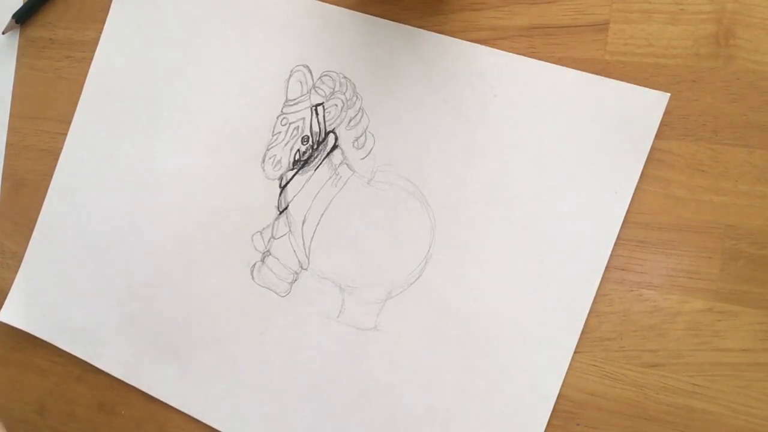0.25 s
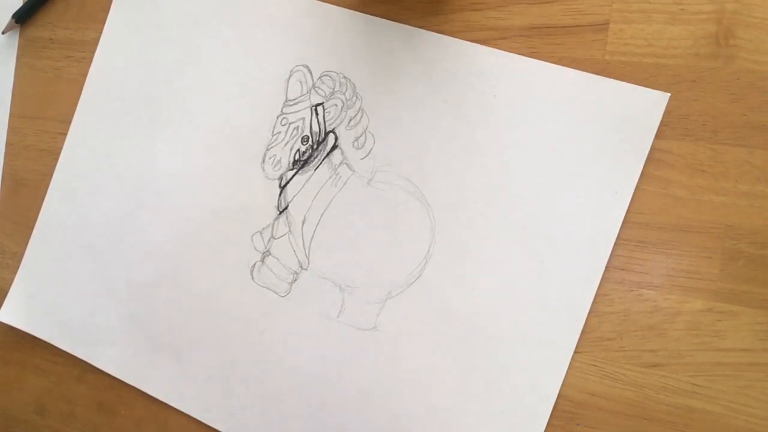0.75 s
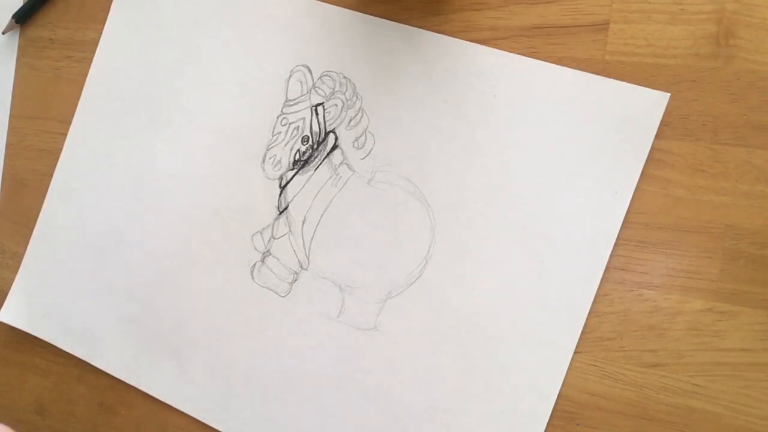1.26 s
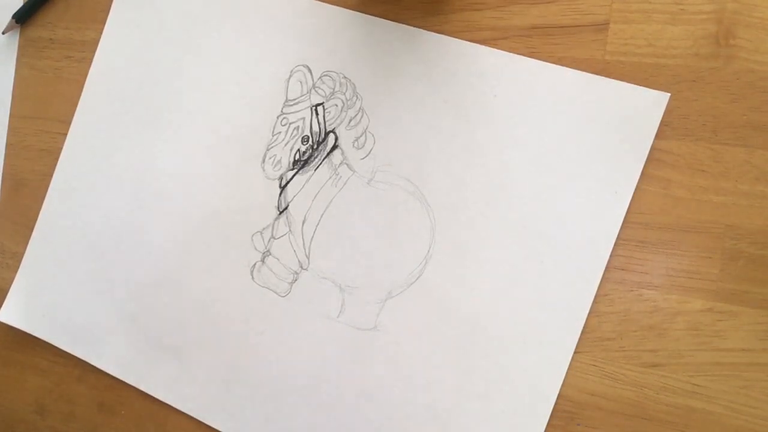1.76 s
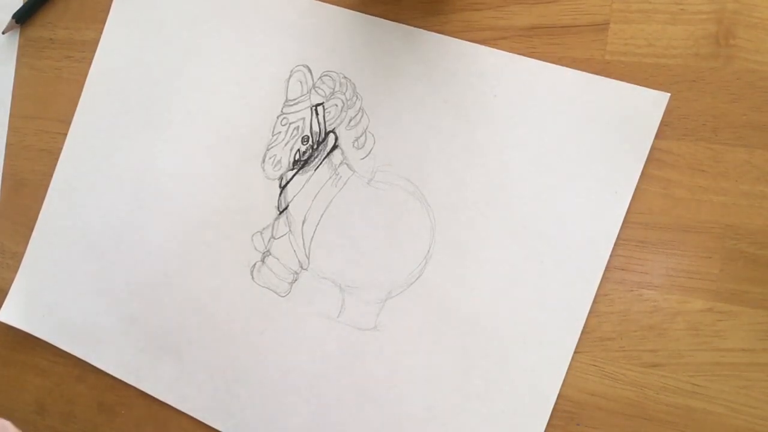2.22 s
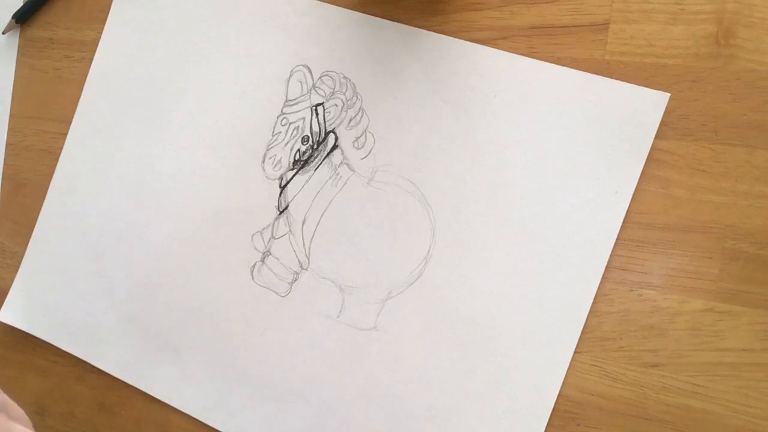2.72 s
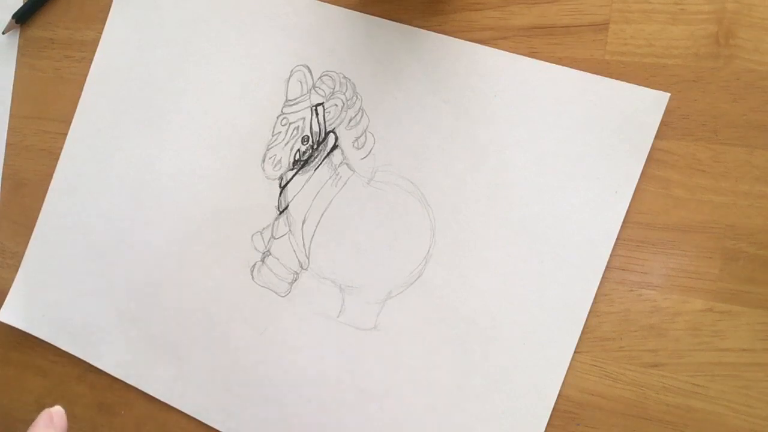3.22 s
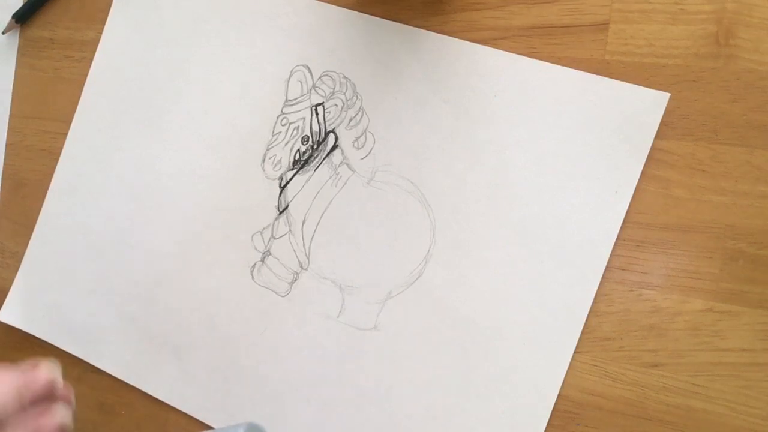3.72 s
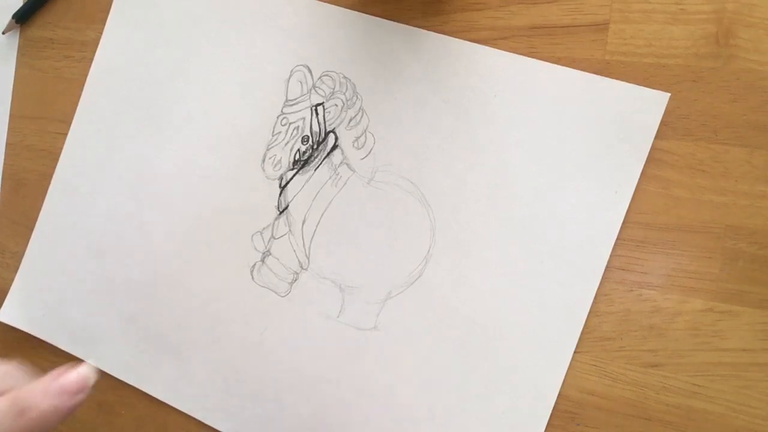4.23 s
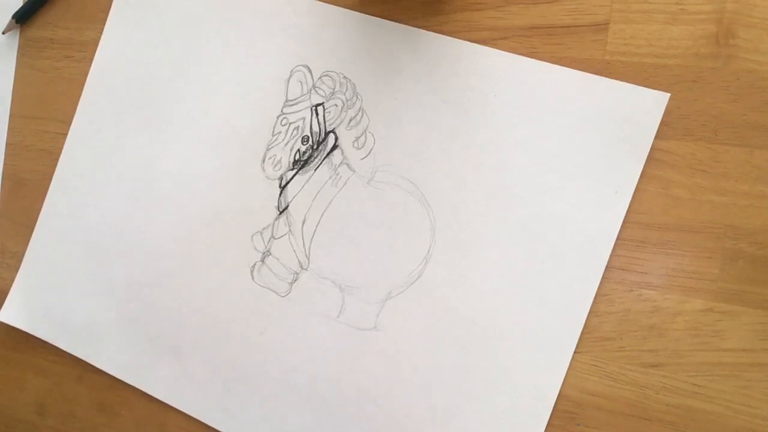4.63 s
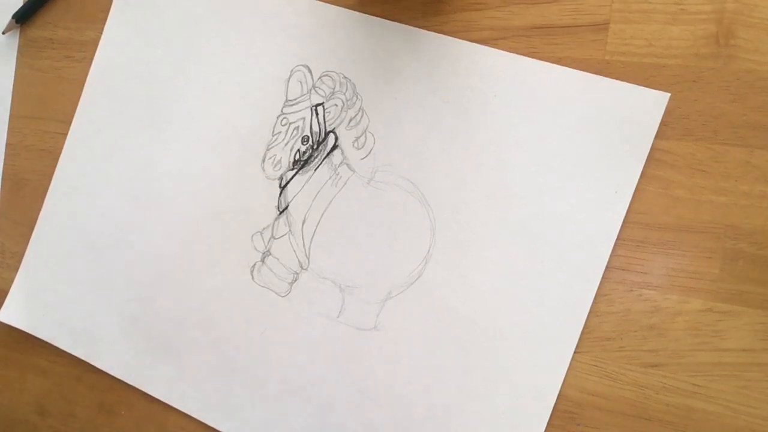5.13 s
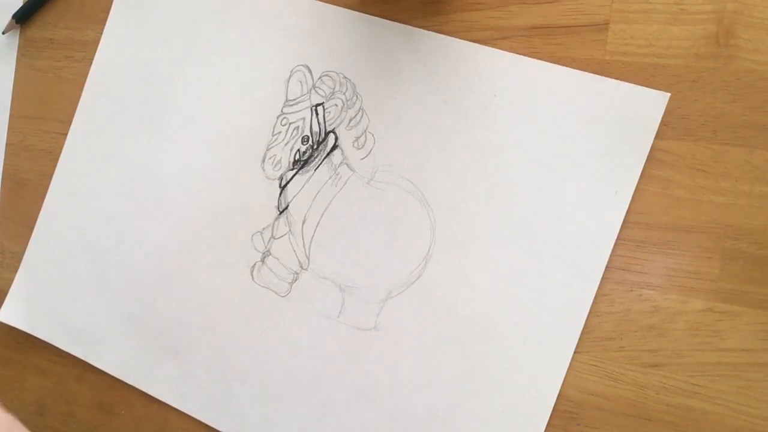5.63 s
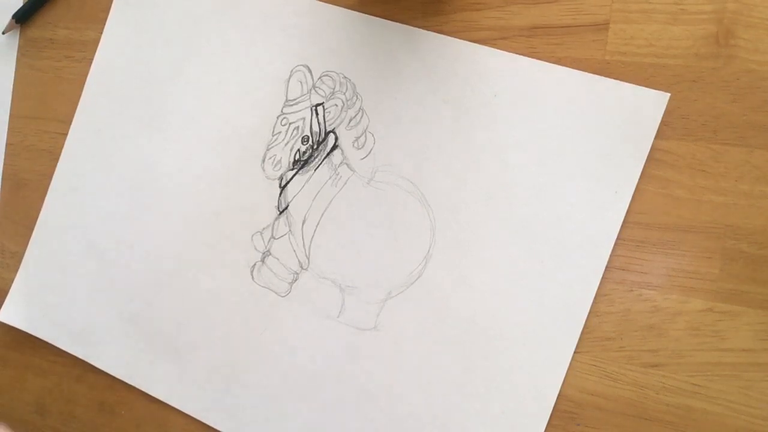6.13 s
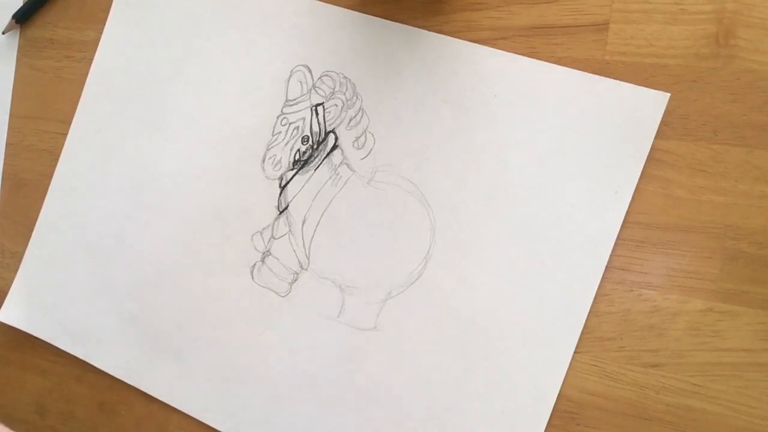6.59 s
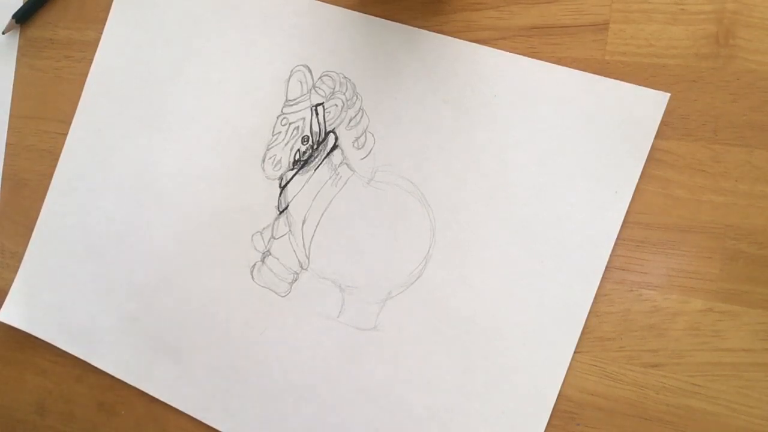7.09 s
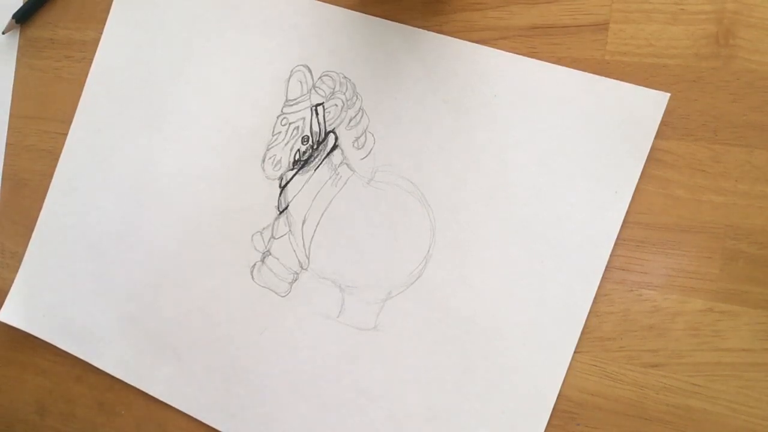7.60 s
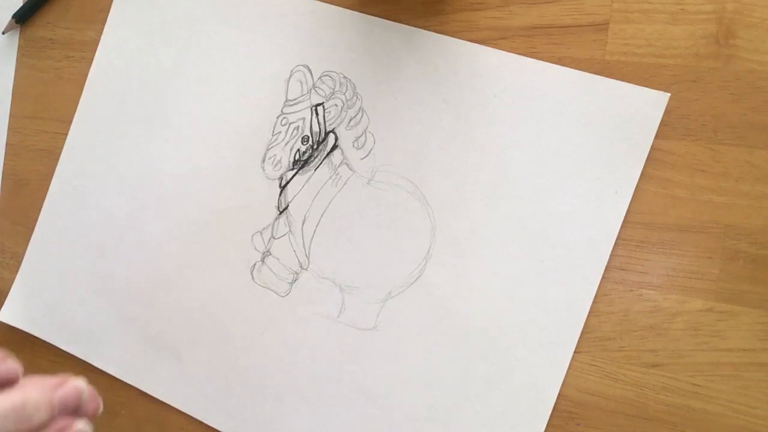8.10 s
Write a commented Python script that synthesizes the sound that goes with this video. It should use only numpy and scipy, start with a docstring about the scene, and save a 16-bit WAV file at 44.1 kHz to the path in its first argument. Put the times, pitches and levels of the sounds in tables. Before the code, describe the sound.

A quiet room with low restless rumble, faint hiss and a wavering distant fan hum, heard close. From 0 to 1.2 s soft dull bumps and a lumpy jostle of hands surround the first short dry rasps of a pencil in a small sharpener, at about 0.5 to 0.85 s. Light clicks follow, then another scraping group from 1.5 to 2 s with tiny cracks. After a near-still pause with small ticks, a denser run at 2.8 to 3.6 s crackles with splinters and ends in a stronger, duller scrape. Faint low bumps follow. Crisp finger clicks come at 4.65 and 4.9 s. A swelling stroke at 5.2 s, a small woody knock at 5.7 s with a rasp, and brief scrapes at 6.3 s lead to the longest burst, 6.9 to 7.8 s, with sharp snaps near 7.2 and 7.75 s. A last small click and swish at 7.9 s, then room tone.

```python
"""A pencil is twisted in a small hand sharpener over a wooden desk in a quiet room.
The blade bites and shaves by stick-slip: noise strokes change level and ease, coloured by wood and echoes.
Splinters snap off as short cracks, and the sharpener clicks in the fingers as decaying shell modes.
Soft low bumps and a jostle are band-limited rumble, and short swishes are resonant grainy noise.
Room hiss, a restless rumble and a wavering fan hum lie beneath; all but these and the low rumbles reverberate."""
import sys
import numpy as np
from scipy import signal
from scipy.fft import rfft, irfft, next_fast_len
from scipy.io import wavfile
from scipy.ndimage import uniform_filter1d

SR = 44100
rng = np.random.default_rng(int(sys.argv[2]) if len(sys.argv) > 2 else 0)


def generate_wav(signal):
    """Clip the signal to [-1, 1] and save it as 16-bit WAV at the path in sys.argv[1]."""
    frames = np.transpose(np.atleast_2d(signal))
    scaled = np.clip(frames, -1, 1) * 32767
    pcm = np.round(scaled).astype(np.int16)
    wavfile.write(sys.argv[1], SR, pcm)


N = 368235
TIME = np.arange(N) / SR

# Strokes of the cut, some in several parts. Each row: start in seconds, bite to crest in seconds,
# ease in seconds, relative level at the bite in dB, relative level at the crest in dB, rasp in dB,
# treble in dB, reference pitch of the main hollow in Hz, pitch of the small hollow in Hz,
# small hollow lift in dB, blade whistle in Hz, whistle lift in dB.
STROKES = [(0.485, 0.023, 0.076, -67, -72.5, 7, 4, 2400, 5230, -8, 9500, -8),
           (0.548, 0.15, 0.11, -63.5, -57.5, 3, 2, 2560, 5200, -2, 9800, -8),
           (0.72, 0.074, 0.076, -60, -50.5, 0.5, 1, 2500, 5300, 0, 9200, 0),
           (1.478, .04, 0.45, -60.5, -60, -2, -4.5, 2340, 5000, 0.5, 8250, 6.5),
           (1.605, 0.16, 0.11, -65.5, -61, 2.5, 2, 2570, 5250, 1.5, 7000, -4),
           (1.775, 0.072, 0.052, -60.5, -54.5, 0.5, 2, 2540, 4900, 0, 8800, 4),
           (1.891, 0.13, .022, -76, -73.5, -2, 4.5, 2600, 5030, -4, 9600, -3),
           (2.833, 0.24, 0.07, -60, -55, 0.5, 2.5, 2550, 5160, 1, 12500, -16),
           (3.112, 0.082, 0.09, -61, -60.5, -4.5, -2.5, 2700, 5150, 8, 9500, 7),
           (3.245, 0.2, 0.02, -64.5, -63.5, -0.5, 0, 2740, 5170, 0, 9300, -6),
           (3.406, 0.035, 0.079, -60, -53.5, -2, -6, 2720, 5200, -1, 8450, 4),
           (3.519, 0.027, 0.082, -46, -48.5, -10.5, -10, 2660, 5370, 2, 9300, -7),
           (5.165, 0.13, 0.04, -70.5, -49, 1, 2, 2580, 5300, -1, 8600, -5),
           (5.733, .16, 0.041, -59, -55.5, 1, 0.5, 2580, 5650, 0, 9900, 3),
           (6.266, 0.09, .035, -63.5, -59, 1.5, 0, 2500, 5200, -3, 11300, 2),
           (6.362, 0.064, 0.072, -57.5, -53.5, 3.5, 3, 2700, 5130, -14, 12300, -2),
           (6.884, 0.12, 0.22, -62, -57.5, 2, -0.5, 2680, 5300, -8, 11800, -4),
           (7.04, 0.14, 0.13, -70, -52.5, 0.5, 2.5, 2580, 5400, -3, 9100, -0.5),
           (7.29, 0.046, 0.17, -69, -61.5, -6, 1, 2750, 5270, -2, 9450, -3),
           (7.402, 0.063, 0.06, -56.5, -55, 4.5, -1.5, 2660, 4900, 4, 9500, -2),
           (7.513, 0.013, 0.13, -62, -60, 2.5, 2.5, 2680, 5130, 3, 11400, 2),
           (7.621, 0.059, 0.12, -60, -54, -7.5, -3, 2920, 5570, -5, 7860, 3),
           (7.733, 0.032, 0.013, -55, -50.5, 1, 0, 2900, 5500, -2, 7950, 1)]


def amp(db):
    """Logarithmic level: decibels become an amplitude gain."""
    return 10 ** (np.asarray(db) / 20)


def evened(x):
    """Mean power: scales a signal to an rms of 1."""
    return x / np.sqrt(np.mean(x ** 2) + 1e-20)


def read(points, hz):
    """Spectral interpolation along a logarithmic frequency axis."""
    f, value = np.transpose(points)
    return np.interp(np.log(hz + 1), np.log(f + 1), value)


def add(mix, s, sound):
    """Superposition: adds a sound in place from time s, or from 0 if s is negative."""
    part = mix[max(round(s * SR), 0):][:len(sound)]
    part += sound[:len(part)]


def band(x, hz, kind, order=2):
    """Butterworth low-pass or high-pass filtering."""
    sections = signal.butter(order, min(hz, SR / 2 - 1), kind, fs=SR, output="sos")
    return signal.sosfilt(sections, x)


def coloured(x, points, size=4096):
    """Minimum-phase filtering: the log spectrum fixes the phase through the Hilbert transform."""
    log_gain = np.log(amp(read(points, abs(np.fft.fftfreq(size, 1 / SR)))))
    taps = np.fft.ifft(np.exp(np.conj(signal.hilbert(log_gain)))).real
    return signal.oaconvolve(x, taps[:size // 2])[:len(x)]


def resonate(x, hz, width):
    """Heterodyne resonance of gain 1: shifts the curve hz to zero, smooths there and shifts back."""
    carrier = np.exp(2j * np.pi * np.cumsum(hz) / SR)
    r = np.exp(-np.pi * width / SR)
    baseband = signal.lfilter([1 - r], [1, -r], x / carrier + 1e-18)
    return 2 * (carrier * baseband).real


def drift(rate):
    """Band-limited random motion of rms 1: noise with only the frequencies below rate in Hz."""
    size = next_fast_len(N, True)
    spectrum = rfft(rng.standard_normal(size))
    slow = np.fft.rfftfreq(size, 1 / SR) < rate
    return evened(irfft(spectrum * slow, size)[:N])


def air(swell_db=1.0, waver=0.49, rumble_swell_db=3.0, rumble_hz=300):
    """Background noise: shaped hiss over a restless rumble, with fan tones wavering in level and phase."""
    # The room's rumble and hiss. Each row: frequency in Hz, relative spectral level in dB.
    air_spectrum = [(15, -63), (25, -20.5), (49, -1), (107, -5.5), (140, -4), (204, -6.5), (297, -9.5),
                    (350, -16.5), (445, -16.5), (614, -19), (762, -24), (1200, -25), (2120, -32),
                    (4300, -42), (12000, -49), (15500, -55.5)]
    # Hum of a distant fan. Each row: frequency in Hz, rms level in dB before wavering.
    fan_tones = [(140, -65.5), (258, -71.5), (362, -76), (600, -77.5)]
    air_db = -55.5  # rms level of the noise
    hz = np.fft.rfftfreq(N, 1 / SR)
    noise = irfft(rfft(rng.standard_normal(N)) * amp(read(air_spectrum, hz)), N)
    rumble = irfft(rfft(noise) / (1 + (hz / rumble_hz) ** 2), N)
    hiss = noise - rumble
    noise = hiss * amp(swell_db * drift(5.5)) + rumble * amp(rumble_swell_db * drift(9.3))
    hum = np.zeros(N)
    for tone_hz, db in fan_tones:
        level = amp(db) * np.sqrt(2) * (1 + waver * drift(6))
        hum += level * np.sin(2 * np.pi * tone_hz * TIME + drift(6.3))
    return amp(air_db) * evened(noise) + hum


def bumps(low_hz=58, knee=0.19, reach=1.32):
    """Band-limited impacts: dull swells of rumble, each with its own upper edge."""
    # Soft low bumps of handling. Each row: centre in seconds, level in dB (the rms is 3 dB lower),
    # length in seconds, edge in Hz that reach and knee multiply into two low-pass corners.
    bump_rows = [(0.025, -39, 0.051, 128), (0.298, -50, .04, 121), (0.387, -43.5, 0.11, 247),
                 (0.462, -38.5, 0.1, 237), (.463, -50, 0.014, 480), (0.588, -44.5, 0.051, 246),
                 (0.662, -43, 0.03, 300), (0.693, -45, 0.036, 280), (0.726, -35, 0.027, 292),
                 (0.765, -34.5, 0.046, 315), (0.869, -33, 0.072, 197), (0.904, -33, 0.029, 220),
                 (0.993, -41, 0.051, 201), (1.032, -38, 0.034, 242), (1.111, -40, 0.0251, 220),
                 (1.145, -36, .045, 188), (1.484, -49.5, 0.075, 99), (2.01, -51.5, .1, 80),
                 (2.52, -53, 0.16, 110), (3.695, -49, 0.043, 110), (4.093, -49, 0.1, 92),
                 (6.048, -43.5, 0.029, 130), (6.193, -41, 0.061, 58), (7.176, -52, 0.11, 130)]
    out = np.zeros(N)
    noise = band(rng.standard_normal(N), low_hz, "high", order=4)
    for s, db, length, hz in bump_rows:
        window = np.hanning(int(length * SR))
        rumble = band(noise[int(s * SR):][:SR // 2], hz * reach, "low", order=3)
        rumble = band(rumble, hz * knee, "low", order=1)
        swell = evened(rumble[-len(window):] * window)
        add(out, s - length / 2, amp(db) * swell / np.sqrt(2))
    return out


def swishes(grain_db=3):
    """Resonant filtering: brief windows of grainy noise, twice filtered around one pitch."""
    # Short grainy swishes: a ringing at the opening, scrapes, and some within the cutting strokes.
    # Each row: centre in seconds (the earliest may be moved to start at 0), level in dB (the rms is
    # 3 dB lower), length in seconds, pitch in Hz, width of each resonance as a share of the pitch.
    swish_rows = [(.058, -74.5, 0.12, 3600, 0.061), (0.08, -65.5, 0.16, 1290, 0.74),
                  (.07, -61, .13, 980, 0.3), (2.487, -70.5, 0.053, 5400, 0.5),
                  (2.531, -70.5, 0.22, 2050, 0.54), (3.58, -63, 0.15, 1700, .9),
                  (3.705, -65.5, 0.1, 2200, 0.95), (4.695, -61, .036, 2160, 0.2),
                  (4.904, -66, 0.044, 2070, 0.3), (0.791, -57.5, 0.031, 1840, 0.29),
                  (5.297, -64.5, .06, 1650, 0.39), (5.719, -63.5, 0.073, 900, 0.34),
                  (6.797, -73, 0.19, 2350, .44), (7.424, -50, 0.043, 2550, 0.23),
                  (7.93, -67, 0.034, 2600, 0.67), (7.929, -66, 0.03, 3920, 0.08)]
    out = np.zeros(N)
    for s, db, length, hz, width_share in swish_rows:
        count = int(length * SR)
        grains = evened(uniform_filter1d(rng.standard_normal(count), size=80))
        push = rng.standard_normal(count) * amp(grain_db * grains)
        pitch, width = np.full(count, hz), hz * width_share
        swish = resonate(resonate(push, pitch, width), pitch, width)
        add(out, s - length / 2, amp(db) * evened(swish * np.hanning(count)) / np.sqrt(2))
    return out


def room(x, size=256):
    """Diffuse reverberation: noise decays at its own rate in each band, fastest in the lows."""
    # Reverberation of the room. Each row: frequency in Hz, decay by 60 dB in seconds.
    decay_times = [(200, .12), (1000, 0.52), (4000, 0.64), (14000, 0.43)]
    hz, t, z = signal.stft(rng.standard_normal(SR // 2), SR, nperseg=size)
    decay = amp(-60 * t / read(decay_times, hz)[:, None])
    tail = signal.istft(z * decay, SR, nperseg=size)[1]
    tail[:SR // 200] = 0  # a gap of 5 ms before the tail
    return signal.oaconvolve(x, tail / np.linalg.norm(tail))[:N]


def jostle(low_hz=52, high_hz=190, lumpy_db=4, lumps_per_s=22):
    """Amplitude-modulated rumble: it swells and fades lumpily as the hands settle into their grip."""
    start_s, length_s, level_db = 0.21, 1.22, -50
    rumble = band(rng.standard_normal(N), low_hz, "high", order=4)
    rumble = band(rumble, high_hz, "low", order=3)
    rumble = band(rumble, low_hz, "low", order=1)
    lumps = amp(lumpy_db * np.tanh(drift(lumps_per_s)))
    arch = np.sin(np.pi * np.clip((TIME - start_s) / length_s, 0, 1))
    return amp(level_db) * evened(rumble * lumps) * arch


def pressure(t, crest_s, ease_s, bite_db, crest_db):
    """Level envelope: the blade bites, the level moves from bite to crest, eases and is released."""
    bite_s, release_s = 0.017, 0.012  # the blade catches and lets go
    # The level moves from bite to crest, slowly at first, then faster; it then eases by ease_db.
    crest_power, ease_db = 1.55, 16
    approach = np.clip(t / crest_s, 0, 1)
    ease = np.clip((t - crest_s) / ease_s, 0, 1)
    held = amp(bite_db + (crest_db - bite_db) * approach ** crest_power - ease_db * ease)
    release = np.exp(-np.maximum(t - crest_s - ease_s, 0) / release_s)
    return np.minimum(t / bite_s, 1) * held * release


def patchy(x, patch_db=1.5, patch_hz=520, patch_s=0.024, size=256):
    """Time-frequency modulation: bright and dull patches come and go as the blade meets new grain."""
    hop = size // 4
    z = signal.stft(x, SR, nperseg=size, noverlap=size - hop)[2]
    field = rng.standard_normal(z.shape)
    for axis, width in enumerate([patch_hz * size / SR, patch_s * SR / hop]):
        for _ in range(2):
            field = uniform_filter1d(field, max(round(width), 1), axis)
    modulated = z * amp(patch_db * evened(field))
    return signal.istft(modulated, SR, nperseg=size, noverlap=size - hop)[1][:N]


def echoed(x, sway=0.1314, sways_per_s=2.5):
    """Comb filtering: near echoes stripe the spectrum, and the stripes slide as the hands move."""
    # First echoes off the fingers, the palm and the desk.
    # Each row: mid delay in seconds, about which it sways, and gain.
    echo_rows = [(.00055, -0.082), (.0011, -0.43), (.0019, .25), (.0042, -0.27)]
    out = x.copy()
    for delay, gain in echo_rows:
        out += gain * np.interp(TIME - delay * np.exp(sway * drift(sways_per_s)), TIME, x)
    return out


def sharpener(force):
    """Source-filter coupling: force sounds through wood, hollows and echoes; gives middle, rasp, treble."""
    # Colour of the cut wood. Each row: frequency in Hz, gain in dB.
    wood_colour = [(200, -42.5), (700, -3.5), (1100, -11), (1600, -3), (2300, -6.5), (2850, -2),
                   (3150, -7.5), (3900, -5.5), (4600, -6.5), (6000, -6), (7000, -7), (9800, -7),
                   (10500, -11.5), (11200, -6.5), (13800, -11.5), (15500, -14)]
    # Hollows of the sharpener and the cupped hand. Each holds: pitch as a multiple of the row's
    # main hollow (first) or small hollow (second), width in Hz, lift in dB.
    main_hollow = (0.92, 526, 13)
    middle_hollow = (0.779, 430, 0.1)
    small_width_hz, whistle_width_hz = 500, 810
    notch_hz, notch_width_hz, notch_depth = 7180, 360, 0.28  # the cupped hand weakens this band
    grip_sway, grip_sways_per_s = 0.04, 12  # rms sway of log pitch, top rate in Hz
    start, *_, main_hz, small_hz, small_db, whistle_hz, whistle_db = np.transpose(STROKES)
    row = np.maximum(np.searchsorted(start, TIME, "right") - 1, 0)

    def held(values):
        """Smoothed steps: each part holds its own colour and glides into the next."""
        return uniform_filter1d(values[row], size=2048)

    def wandering(hz):
        """Frequency modulation: the pitch sways as the grip shifts."""
        return held(hz) * np.exp(grip_sway * drift(grip_sways_per_s))

    sound = coloured(force, wood_colour)
    for hz, (ratio, width, db) in [(main_hz, main_hollow), (small_hz, middle_hollow)]:
        sound = sound + amp(db) * resonate(sound, ratio * wandering(hz), width)
    # The small hollow opens and closes from part to part; the blade sings in one narrow band.
    sound = sound + amp(held(small_db)) * resonate(sound, wandering(small_hz), small_width_hz)
    sound = sound + amp(held(whistle_db)) * resonate(sound, held(whistle_hz), whistle_width_hz)
    swallowed = notch_depth * resonate(sound, np.full(N, notch_hz), notch_width_hz)
    sound = echoed(sound - swallowed)

    def above(hz):
        """Linear crossover, 600 Hz wide: keeps what lies above hz."""
        gain = np.clip((np.fft.rfftfreq(N, 1 / SR) - hz) / 600 + .5, 0, 1)
        return irfft(rfft(sound) * gain, N)

    upper, treble = above(3200), above(6000)
    return sound - upper, upper - treble, treble


def shaving(slips_per_s=210, clump_db=1.5, slip_spread_db=1, fibre_spread_db=1.0):
    """Stick-slip friction: the blade slips unevenly, each slip tearing fibres over a steady hiss."""
    slip_s, slip_jitter, steady_hiss = .0008, .62, .45  # slip decay, rms of log rate, hiss gain
    rasp_change_db = -1.5  # through each part the rasp gives way to a finer hiss
    cycles = np.cumsum(slips_per_s * np.exp(slip_jitter * drift(150))) / SR
    slip_db = slip_spread_db * np.clip(rng.standard_normal(N), -2, 2)
    slips = np.diff(np.floor(cycles), prepend=0) * amp(slip_db)
    tearing = evened(signal.lfilter([1], [1, -np.exp(-1 / (slip_s * SR))], slips))
    tearing = evened(tearing * amp(clump_db * np.tanh(drift(30))))  # slips come in clumps
    fibres = rng.standard_normal(N) * amp(fibre_spread_db * drift(3000))
    force = patchy(fibres * (steady_hiss + tearing / 2))
    middle, rasp, treble = (evened(part) for part in sharpener(force))
    out = np.zeros(N)
    for start, crest_s, ease_s, bite_db, crest_db, rasp_db, treble_db, *_ in STROKES:
        on = (TIME >= start) & (TIME < start + 1)
        t = TIME[on] - start
        progress = np.minimum(t / (crest_s + ease_s), 1) - .5
        rasp_gain = amp(rasp_db + rasp_change_db * progress)
        cut = middle[on] + rasp_gain * rasp[on] + amp(treble_db) * treble[on]
        out[on] += pressure(t, crest_s, ease_s, bite_db, crest_db) * cut
    return out


def splinters(snap_s=0.0011, level_db=-7.0, rasp_db=-1.5):
    """Impulsive fracture: each splinter breaks in a short crack that rings through the sharpener."""
    # Large splinters that snap off. Each row: start in seconds, force in dB before the filters
    # and level_db, treble in dB, which glides from snap to snap.
    snap_rows = [(.496, -52, 3), (.682, -43, -3), (.742, -42, -1), (1.522, -47, -4), (1.6263, -42, -8),
                 (1.855, -41, -4), (3.099, -45, 2), (3.2015, -41.5, 0), (3.315, -48, 6), (3.363, -38, 2.5),
                 (3.386, -39, 2), (3.421, -40, -3), (3.444, -43.5, -1), (3.494, -51, -3), (3.5405, -40, 1),
                 (5.262, -41, 2), (5.3234, -38, -1), (5.872, -41, 3), (5.898, -41, -5), (6.2682, -39.5, -3),
                 (7.1814, -34, -8), (7.3694, -40.5, -10), (7.431, -40, -10), (7.449, -39, 4),
                 (7.475, -41, -7), (7.527, -44, -2), (7.725, -42, -4), (7.7446, -33.5, -16),
                 (7.761, -36, -1)]
    t, force = np.arange(SR // 100) / SR, np.zeros(N)
    for s, db, _ in snap_rows:
        crack = evened(rng.choice([-1, 1], len(t)) * np.exp(-t / snap_s))
        add(force, s, amp(db) * crack * np.sqrt(snap_s / t[-1]))
    middle, rasp, treble = sharpener(force)
    s, _, treble_db = np.transpose(snap_rows)
    treble_gain = amp(np.interp(TIME, s, treble_db))
    return amp(level_db) * (middle + amp(rasp_db) * rasp + treble_gain * treble)


def struck(modes, crack_db, crack_s=0.0015):
    """Modal impact: a dry crack of contact and exponentially dying modes."""
    t = np.arange(SR // 16) / SR
    ring = np.zeros(len(t))
    for hz, db, t60 in modes:
        ring += amp(db - 60 * t / t60) * np.sin(2 * np.pi * (hz * t + rng.random()))
    crack = band(rng.standard_normal(len(t)), 810, "high") * np.exp(-t / crack_s)
    return ring + amp(crack_db) * crack


def peaked(x, db):
    """Peak normalisation: scales to a peak level."""
    return amp(db) * x / abs(x).max()


def handling(seat_db=-32, click_db=1, rebound_db=-21, detune=0.017):
    """Damped modal impacts: shell clicks in the fingers, and the pencil knocking home with two rebounds."""
    # Clicks of the sharpener in the fingers. Each row: start in seconds, peak in dB before click_db,
    # brightness as a corner in Hz, ring of the shell in dB.
    click_rows = [(.978, -53.5, 4500, -16), (1.05, -58.5, 11100, -20), (1.241, -55, 2010, 0),
                  (1.351, -54.5, 2230, -5), (2.323, -58.5, 20000, -17), (2.383, -54, 4600, -4),
                  (4.641, -36.5, 11800, -2.5), (4.686, -50.5, 3580, -1), (4.8821, -39, 3550, -7),
                  (4.93, -53.5, 6000, -8), (6.205, -54, 2200, 4), (6.832, -53.5, 15000, -12),
                  (7.867, -50, 2980, -21)]
    # Modes of the sharpener's shell. Each row: frequency in Hz before detuning,
    # level in dB before the click's ring is added, decay by 60 dB in seconds.
    shell_modes = [(1500, -7.5, 0.033), (1980, 6.5, 0.016), (2500, -4, 0.018), (2960, -2, 0.014),
                   (4070, -6.5, 0.017), (5300, -16, 0.011), (8400, -6, 0.0036), (13300, 2, 0.004)]
    # Modes of the pencil as it knocks home in the cone.
    # Each row: frequency in Hz, relative level in dB, decay by 60 dB in seconds.
    seat_modes = [(775, 7.5, 0.016), (950, -7, .011), (2370, -6, 0.0099), (3580, -3.5, 0.014),
                  (5260, -9, .0058), (6300, -8, 0.0091), (7100, -7, 0.011), (9300, -8, 0.0067)]
    out = np.zeros(N)
    for s, db, corner_hz, ring_db in click_rows:
        modes = [(hz * np.exp(detune * rng.standard_normal()), level + ring_db, t60)
                 for hz, level, t60 in shell_modes]
        click = band(struck(modes, crack_db=0), corner_hz, "low", order=4)
        click = band(click, corner_hz / 7, "high")
        add(out, s, peaked(click, db + click_db))
    knocks = [(5.6925, seat_db), (5.701, seat_db + rebound_db), (5.7095, seat_db + rebound_db)]
    for s, db in knocks:
        knock = band(struck(seat_modes, crack_db=-10), 480, "high")
        add(out, s, peaked(knock, db))
    return out


def scene(shaving_db=-4.5, cut_room_db=-19, click_room_db=-13):
    """Superposition of direct and reverberant sound: sharpening and handling in the quiet room."""
    cut = amp(shaving_db) * shaving() + splinters()
    fingers = handling() + swishes()
    reverberation = room(amp(cut_room_db) * cut + amp(click_room_db) * fingers)
    return (cut + fingers + reverberation + bumps() + jostle() + air())[None]


def record(dry):
    """Linear-phase low-pass filtering: limits the band of the whole sound."""
    edge_hz = 15830
    taps = signal.firwin(511, edge_hz, window=("kaiser", 9), fs=SR)
    return signal.oaconvolve(dry, taps[None], "same")


dry = scene()
out = record(dry)
generate_wav(out)
```